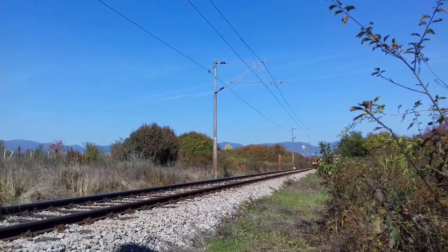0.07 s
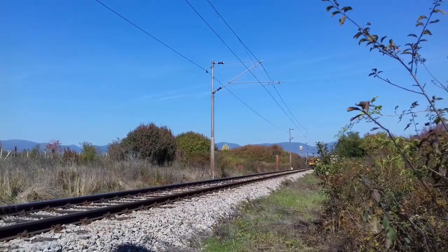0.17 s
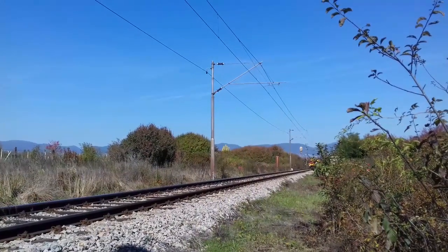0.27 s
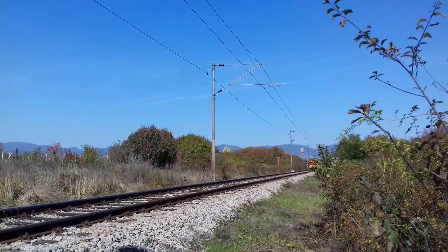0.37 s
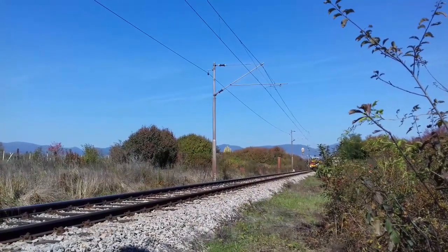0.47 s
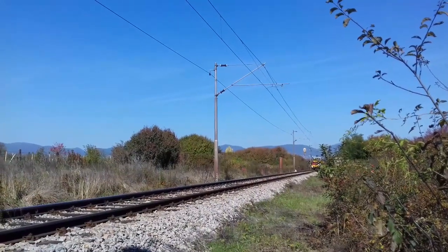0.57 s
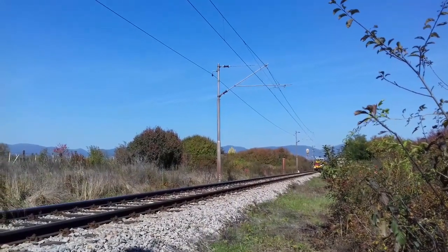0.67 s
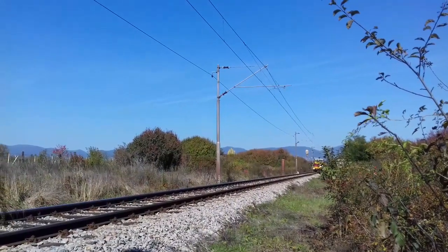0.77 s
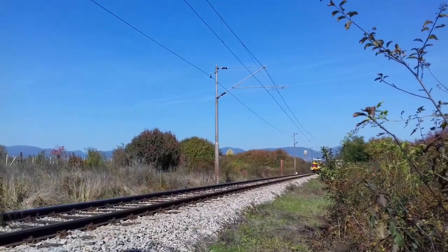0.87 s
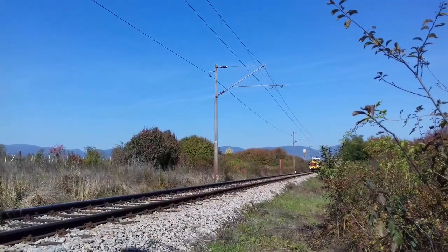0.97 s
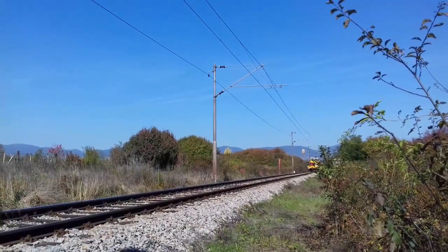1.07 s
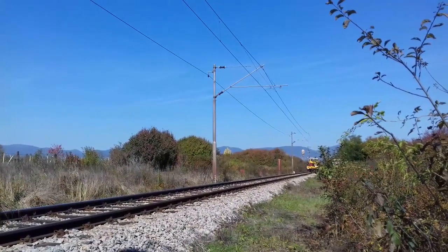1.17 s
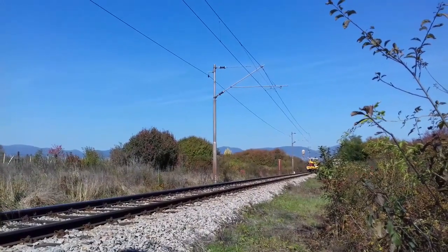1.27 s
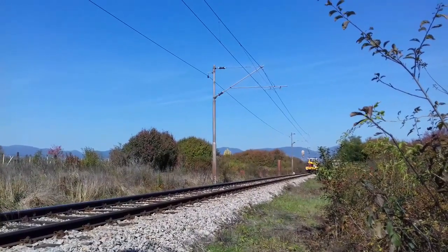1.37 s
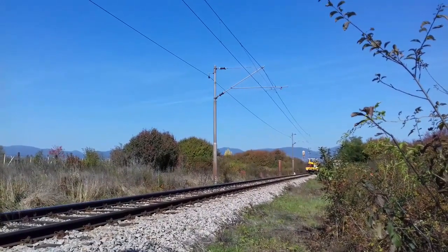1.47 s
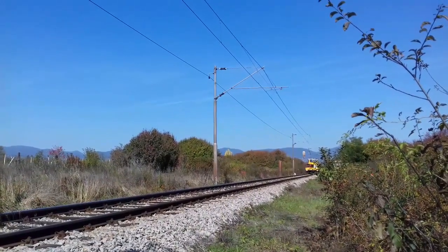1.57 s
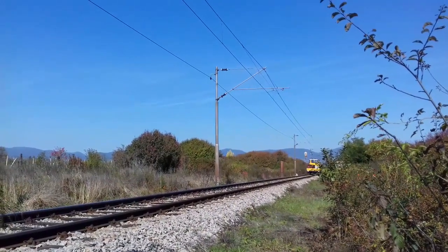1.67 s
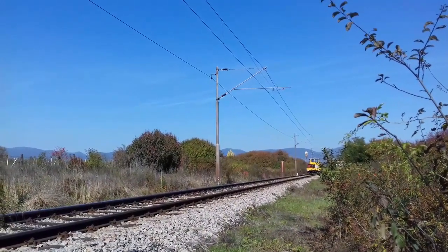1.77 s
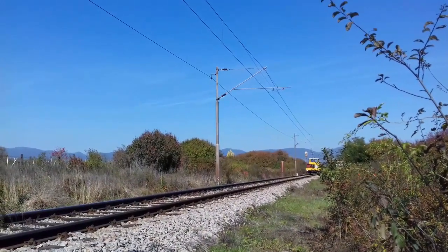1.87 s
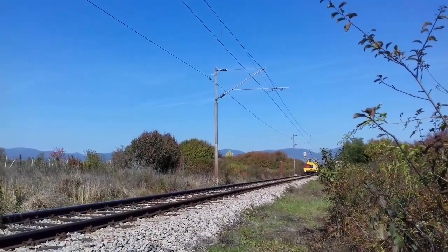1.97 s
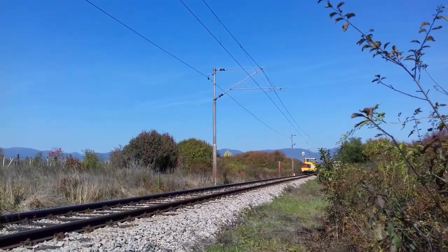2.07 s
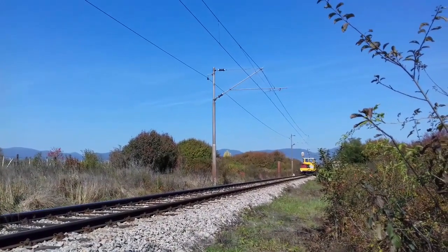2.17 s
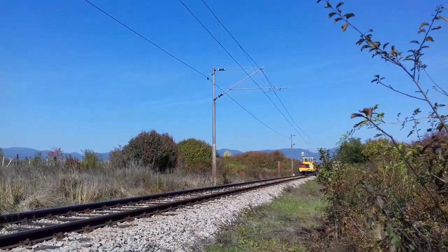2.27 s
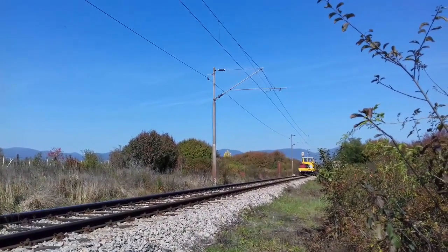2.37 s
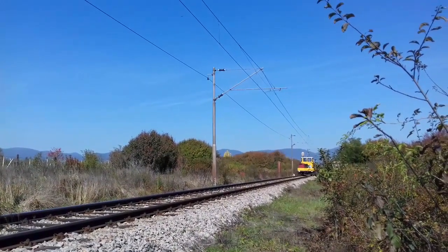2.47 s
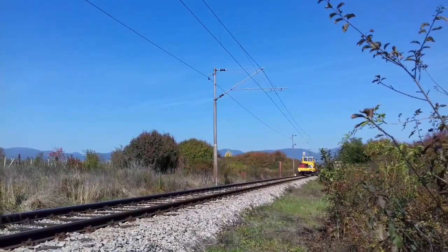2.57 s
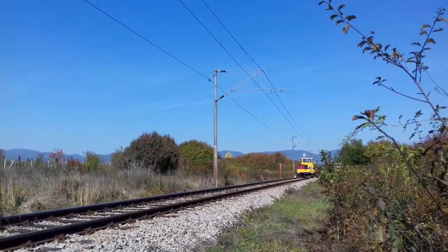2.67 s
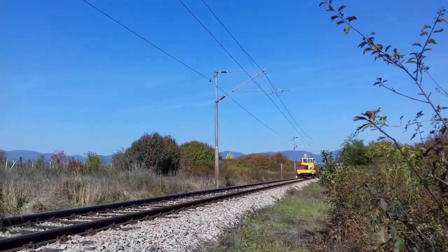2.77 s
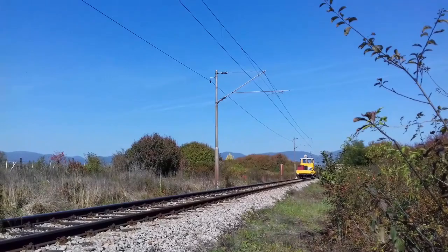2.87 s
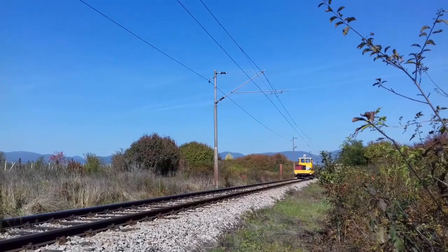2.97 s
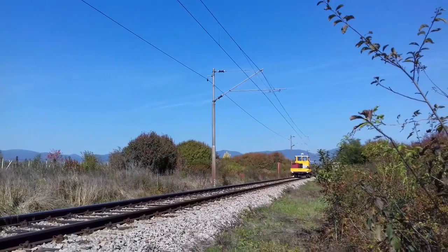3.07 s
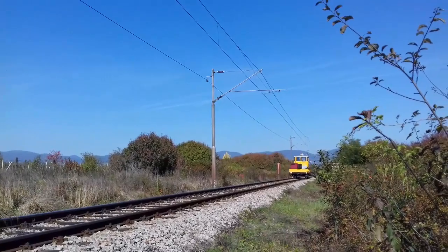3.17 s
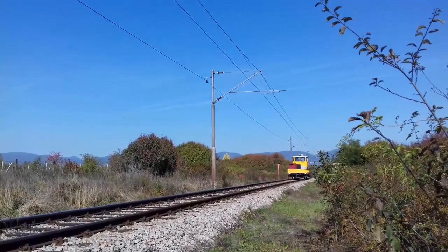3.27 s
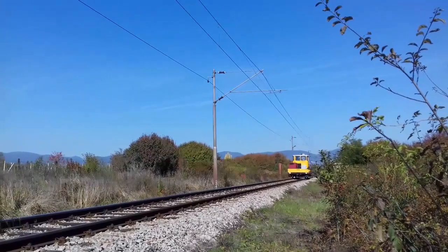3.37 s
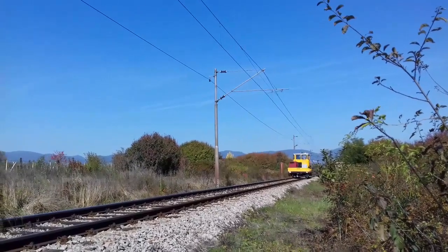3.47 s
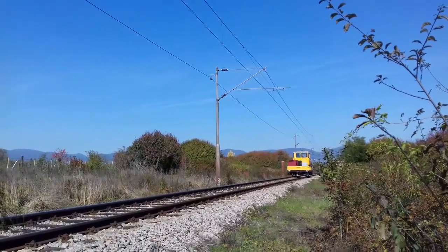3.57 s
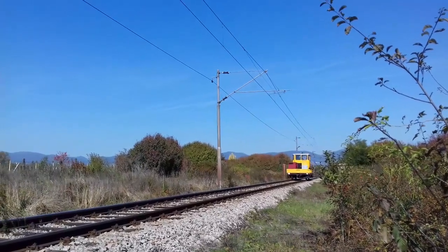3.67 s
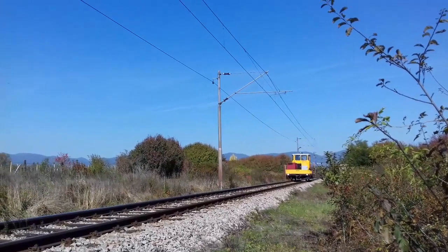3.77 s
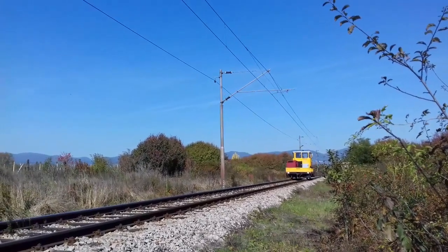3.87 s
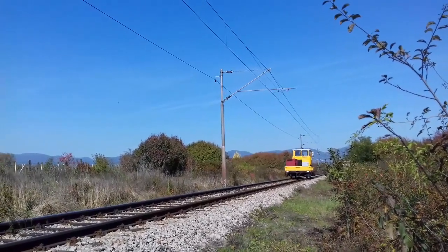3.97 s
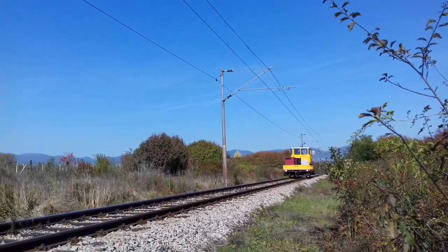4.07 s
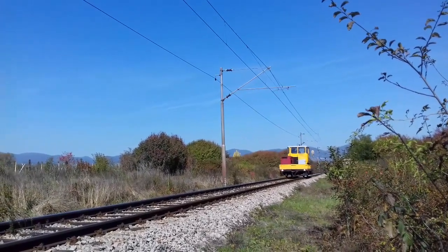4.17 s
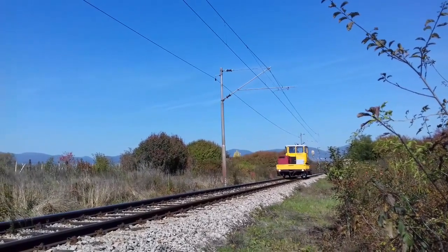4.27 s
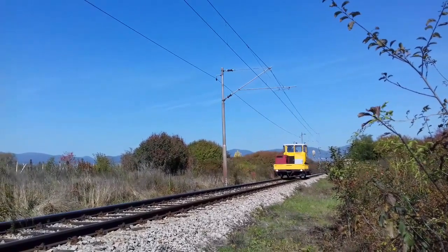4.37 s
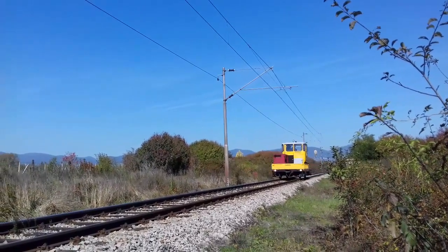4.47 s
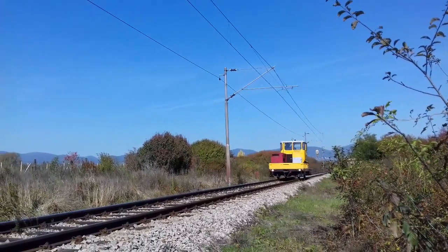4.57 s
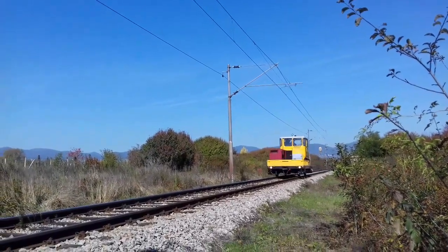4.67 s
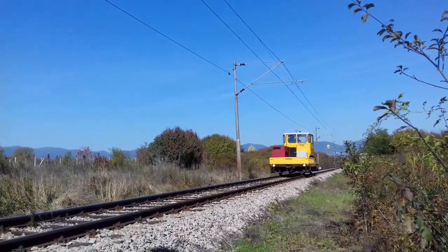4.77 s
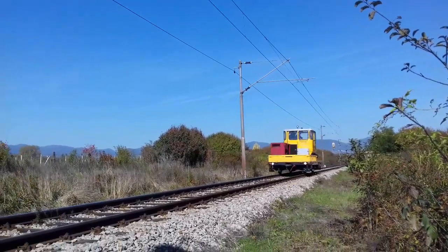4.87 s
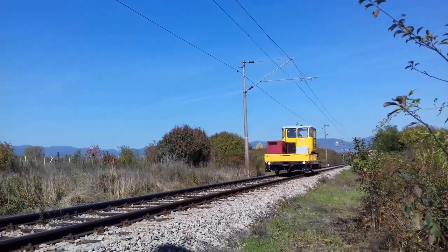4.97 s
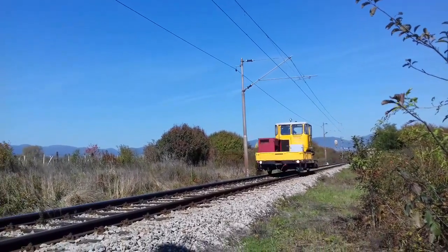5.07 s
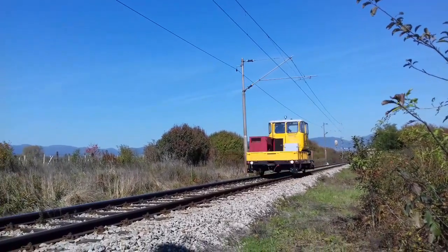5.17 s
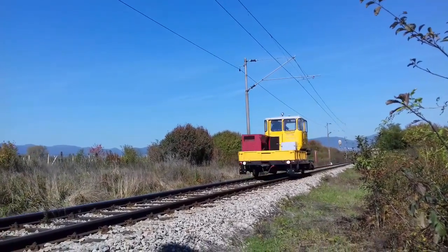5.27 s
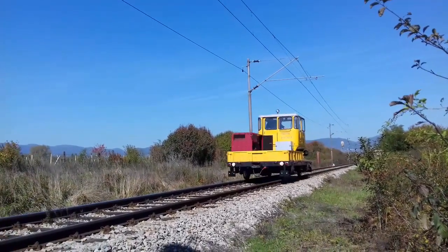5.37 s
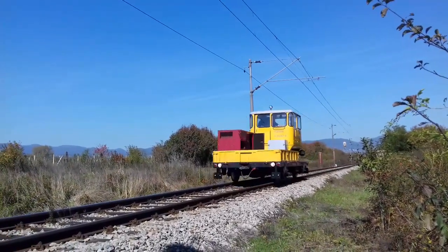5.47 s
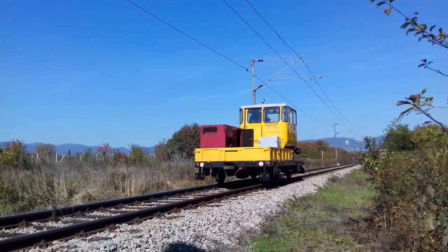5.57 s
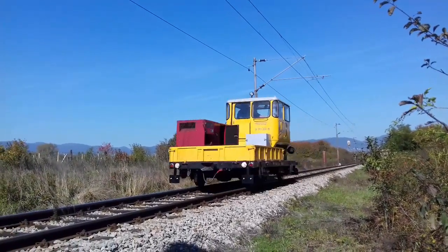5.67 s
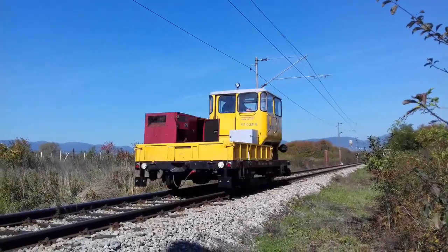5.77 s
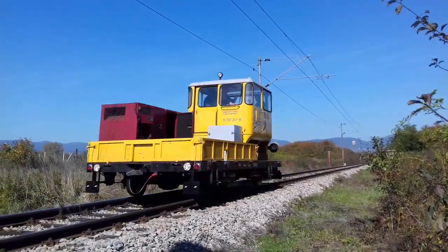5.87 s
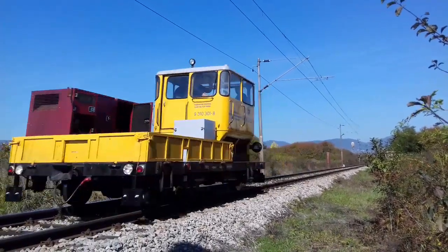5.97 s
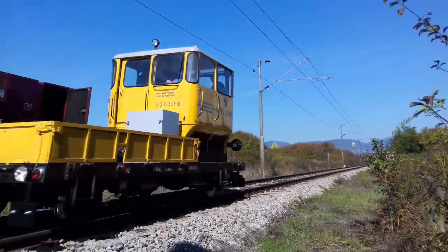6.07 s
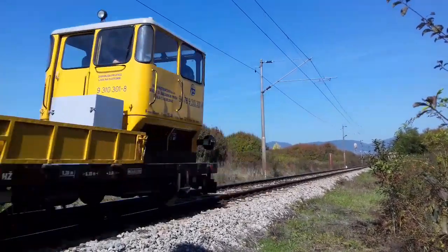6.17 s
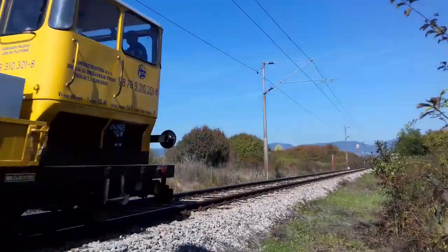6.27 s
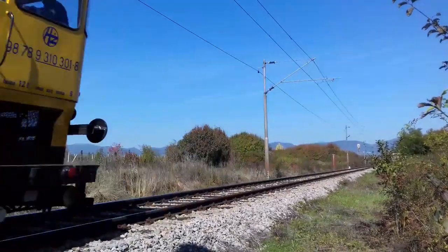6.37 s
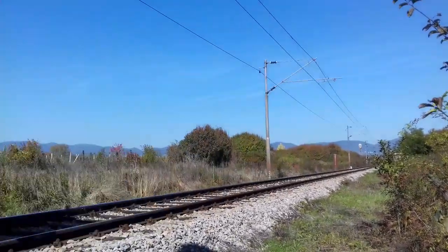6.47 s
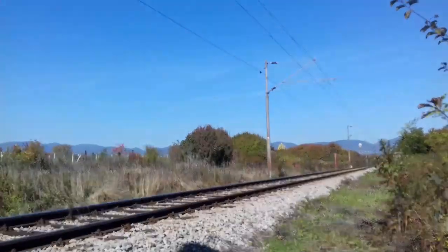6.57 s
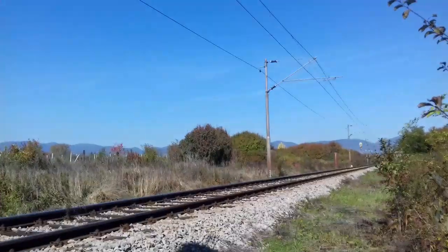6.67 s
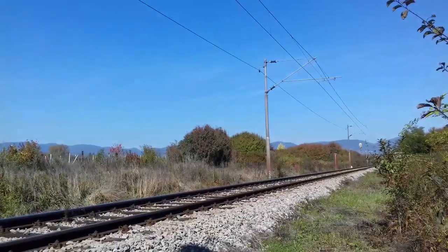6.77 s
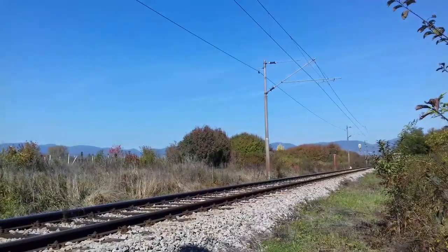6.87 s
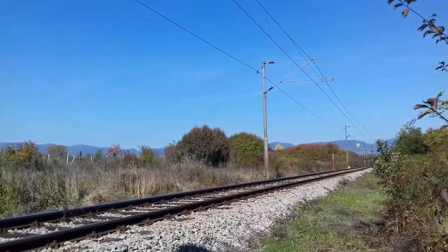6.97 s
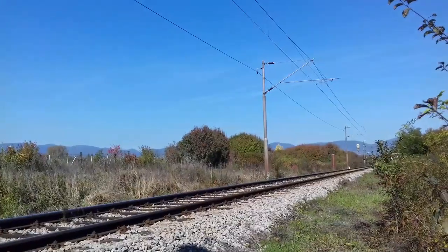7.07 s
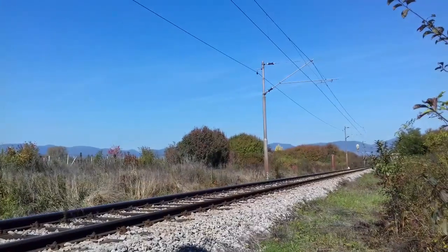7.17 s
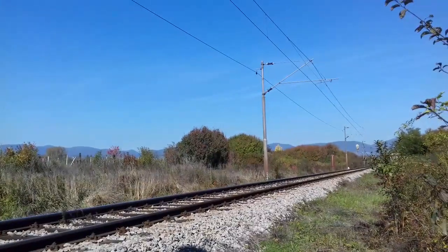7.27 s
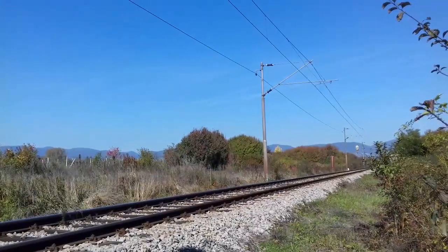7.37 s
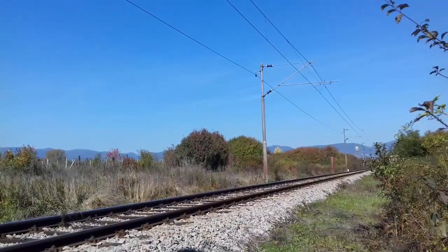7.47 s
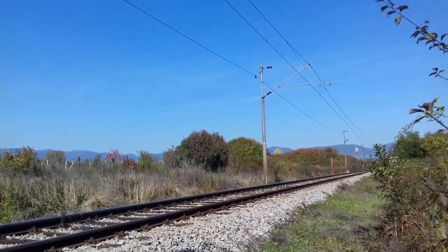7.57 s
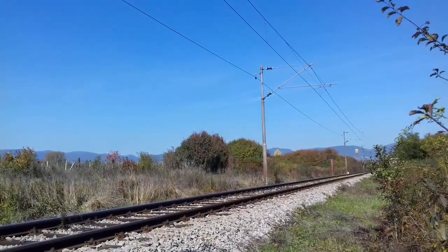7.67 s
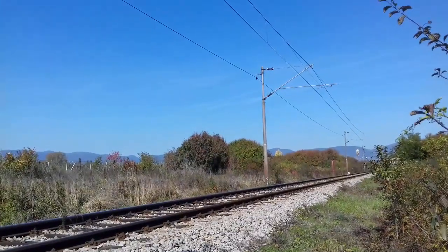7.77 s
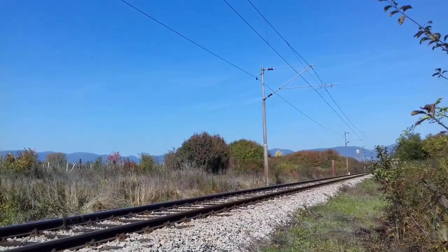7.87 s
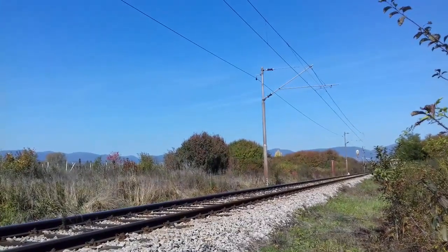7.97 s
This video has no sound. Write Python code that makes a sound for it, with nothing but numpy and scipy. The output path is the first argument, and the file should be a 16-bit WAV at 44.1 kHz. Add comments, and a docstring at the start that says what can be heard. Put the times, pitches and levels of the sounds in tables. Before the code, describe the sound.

A trackside spot in open fields, dry and quiet. From 0 to 2 seconds there is only faint air noise, a low wavering hum and a very distant rolling hiss with a soft diesel drone. Between 2 and 4.5 seconds the small rail trolley gradually grows, its rough wheel noise mid-heavy, the engine hum fluttering beneath. From about 4.8 seconds it swells rapidly; hollow comb-like colours slide down and then back up through the roar, with a faint thin wheel squeal around 5.2 to 5.7 and light knocks and rattle from 5.4. The loudest, fullest rush is about 6 to 6.7 seconds, with a sharper knock near 6.4 and a low body boom around 6.5. The engine pitch drops as it passes. After 6.8 the roar falls away quickly, with a few faint knocks, leaving a receding hollow rumble and hiss until 8 seconds.

```python
"""Straight track through open fields: a small diesel rail trolley comes down it, passes and leaves. Wheels and
rails: noise shaped by broad lifts, with rattle and knocks; a family of dips slides through the roar while
abreast. Engine: sines on multiples of a firing rate that drops in pitch on passing. Fields: faint steady noise
and a wavering low hum."""
import sys
import numpy as np
from scipy import signal
from scipy.io import wavfile
from scipy.ndimage import uniform_filter1d

SR = 44100
rng = np.random.default_rng(int(sys.argv[2]) if len(sys.argv) > 2 else 0)


def materialize(psi):
    """Save the field psi as 16-bit PCM at rate SR to the path in sys.argv[1].

    A 1-D psi becomes a single channel; in a 2-D psi each row is a channel.
    """
    bounded = np.clip(np.atleast_2d(psi).T, -1, 1)
    quanta = np.round(bounded * 32767).astype(np.int16)
    wavfile.write(sys.argv[1], SR, quanta)


N = 353682  # samples
HOP = 256  # samples between short-time spectra
WINDOW = 8 * HOP  # samples

# roar level over 400-5000 Hz: (time [s], level [dB])
ROAR_LEVEL = [(0.0, -50.5), (1.8, -44.5), (3.39, -38.5), (4.8, -27), (4.93, -25.5), (5.25, -23.5),
              (5.3, -21), (5.45, -22), (5.5, -19), (6.08, -12.5), (6.59, -13), (6.86, -16.5), (7.12, -17.5),
              (7.16, -22), (7.3, -24), (7.73, -29), (7.91, -28.5), (8.02, -25)]
# hiss above 5 kHz re roar: (far off [dB], ahead [dB], abreast [dB], behind [dB])
HISS_RE_ROAR_DB = (-23.5, -22, -22.5, -17)


def gain_of(db):
    """dB to amplitude gain."""
    return 10 ** (np.asarray(db) / 20)


def evened(x):
    """Scales to rms 1."""
    return x / np.sqrt(np.mean(x ** 2) + 1e-20)


def read(points, hz):
    """Interpolates a spectrum on a log-frequency axis."""
    f, value = np.transpose(points)
    return np.interp(np.log(hz + 1), np.log(f + 1), value)


def columns(rows, t):
    """Interpolates each column of a curve table at times t; end rows hold."""
    s, *values = np.transpose(rows)
    return [np.interp(t, s, v) for v in values]


def bell(x, centre, width):
    """Gaussian of height 1; width is taken at half height."""
    return np.exp(-4 * np.log(2) * ((x - centre) / width) ** 2)


def bumps_db(rows, hz):
    """Sums bell-shaped spectral lifts in dB."""
    return sum(lift_db * bell(hz, centre_hz, width_hz) for centre_hz, width_hz, lift_db in rows)


def wander(smooth_s):
    """Smoothed random drift of rms 1."""
    size = max(round(smooth_s * SR), 1)
    once = uniform_filter1d(rng.standard_normal(N), size)
    return evened(uniform_filter1d(once, size))


def grid():
    """Frequencies (column) and times of the short-time spectra."""
    hz = np.fft.rfftfreq(WINDOW, 1 / SR)[:, None]
    return hz, np.arange(N // HOP + 12) * HOP / SR


def shaped(x, gain):
    """Filters x by a gain over frequency and time."""
    size = dict(nperseg=WINDOW, noverlap=WINDOW - HOP)
    z = signal.stft(x, **size)[2]
    return signal.istft(z * gain[:, :z.shape[1]], **size)[1][:N]


def by_angle(t, far, ahead, abreast, behind):
    """Blends four values as the view of the trolley turns."""
    # far to ahead, ahead to abreast, abreast to behind: (start [s], end [s])
    turn_spans = [(1.8, 3.1), (4.9, 6.3), (6.7, 7.25)]
    near, past, gone = (np.interp(t, span, [0, 1]) for span in turn_spans)
    approach = (1 - near) * far + near * ahead
    return (1 - past) * approach + (past - gone) * abreast + gone * behind


def view_colour_db(hz, t):
    """Roar spectrum by viewing angle: broad lifts ahead, frame and axle resonances abreast."""
    # roar spectrum before levelling, by view: (frequency [Hz], density [dB per Hz])
    far = [(15, -60), (30, -20), (80, -10.5), (200, -10), (450, -9.5), (1100, 0.5), (2100, -4), (2600, -6),
           (3150, -4), (3480, -12), (4000, -6), (4500, -12.5), (5200, -32.5), (7400, -37), (15800, -48)]
    ahead = [(15, -70), (30, -26.5), (170, -1.5), (450, -8.5), (1000, -4), (1900, -6.5), (2500, -10),
             (3150, -11), (3480, -15.5), (4000, -12), (4600, -18), (5200, -28), (7400, -37), (15800, -46.5)]
    abreast = [(15, -61), (25, -21), (59, -33), (133, -14), (222, -10), (261, -10.5), (371, -8), (691, 1),
               (929, -1), (1320, -1.5), (1980, -12), (2660, -9), (3680, -10), (5820, -29), (15800, -47)]
    behind = [(15, -69), (25, -42), (70, -17), (110, -14), (235, -7), (269, -13), (414, 0), (513, -2),
              (981, -1.5), (1320, -6), (2590, -5), (3300, -11), (4210, -10.5), (7220, -34.5),
              (15800, -47.5)]
    # broad lifts while the trolley is ahead; the top two are thin airy bands above 9 kHz: (centre [Hz], width
    # [Hz], lift [dB])
    ahead_lifts = [(672, 300, 7.5), (1172, 264, 6), (1960, 570, 4.5), (3210, 1130, 2), (6000, 870, 2.5),
                   (9800, 330, 2), (13800, 900, 4)]
    # frame and axle resonances heard from abreast: (centre [Hz], width [Hz], lift [dB])
    frame = [(147, 21, 2), (283, 25, 4), (556, 37, 1.5), (740, 22, -0.5), (1096, 43, 3), (1383, 160, 3),
             (1775, 48, 4.5), (1976, 260, 4.5)]
    ahead_lift_db = bumps_db(ahead_lifts, hz)
    return by_angle(t, read(far, hz) + 0.78 * ahead_lift_db, read(ahead, hz) + ahead_lift_db,
                    read(abreast, hz) + bumps_db(frame, hz), read(behind, hz))


def sliding_dips(hz, t):
    """Comb gain of dips repeating up the spectrum, and dB lift of the bright bands between them."""
    # (time [s], lowest dip [Hz], depth before treble blur [0-1], bright-band lift [dB])
    dips = [(0, 3500, 0.3, -2), (3, 3830, 0, -2), (4.75, 3500, 0.42, 0), (4.9, 3280, 0.64, 3),
            (5.0, 2900, 0.76, 3), (5.06, 2570, .9, 9.5), (5.2, 1940, .73, 3.5), (5.3, 1730, .55, 3.5),
            (5.45, 1500, 0.6, 2.5), (5.58, 1670, 0.92, 1), (5.68, 2180, .6, 7.5), (5.8, 2570, 0.9, 5.5),
            (6.0, 2710, 0.77, 6), (6.6, 2743, 0.48, 4), (6.8, 2640, 0, 1.5), (6.95, 1300, 0, 3),
            (7.3, 600, 0, 0)]
    step_hz, bright_width_hz, bright_top_hz = 3800, 1260, 3920
    dip_hz, depth, lift_db = columns(dips, t)
    depth = np.clip(depth, 0, 1) / (1 + (hz / 7000) ** 2)  # blurred in the treble
    off_hz = (hz - dip_hz + step_hz / 2) % step_hz - step_hz / 2  # offset from nearest dip
    cut = depth * bell(off_hz, 0, 330 + 0.23 * dip_hz)
    comb = 1 - cut / (1 + (900 / (hz + 1)) ** 4)  # dips fade out in the bass
    bright_hz = np.minimum(2230 + 0.63 * dip_hz, bright_top_hz)  # lowest band follows part of the slide
    bands = sum(bell(hz, bright_hz + k * step_hz, bright_width_hz) for k in range(4))
    return comb, lift_db * bands


def ground_echo_db(hz, t):
    """Ground echo hollows a broad band of the roar, rising in pitch as the trolley leaves."""
    # (time [s], centre [Hz], depth [dB]); first row holds before its time
    hollow = [(6.85, 1006, 5.5), (7.05, 1050, 7), (7.3, 1330, 7.5), (7.7, 1590, 7), (8.02, 1640, 5.5)]
    hollow_hz, depth_db = columns(hollow, t)
    return -depth_db * bell(hz, hollow_hz, 1000)


def booms_db(hz, t, edge_s=0.062):
    """Low booms of the body, front then tail: gliding broad lifts of the roar."""
    # (start [s], end [s], start pitch [Hz], end pitch [Hz], lift [dB])
    booms = [(4.6, 6.1, 790, 634, 3), (6.42, 6.56, 290, 300, 12), (6.5, 7.08, 324, 380, 7),
             (6.08, 6.24, 650, 680, 2.5)]
    total_db = 0
    for start_s, end_s, start_hz, end_hz, lift_db in booms:
        boom_hz = np.interp(t, [start_s, end_s], [start_hz, end_hz])
        on = np.clip(np.minimum(t - start_s, end_s - t) / edge_s + 0.5, 0, 1)
        total_db = total_db + lift_db * on * bell(hz, boom_hz, 0.8 * boom_hz)
    return total_db


def squeal_db(hz, t):
    """Faint thin wheel squeal: a narrow lift of the roar that swells and fades."""
    # (half-height start [s], half-height end [s], centre [Hz], width [Hz], lift [dB])
    squeal = (5.2, 5.7, 5300, 300, 6.7)
    start_s, end_s, centre_hz, width_hz, lift_db = squeal
    swell = bell(t, (start_s + end_s) / 2, end_s - start_s)
    return lift_db * bell(hz, centre_hz, width_hz) * swell


def rumble_re_roar_db(t):
    """Rumble level re roar by angle, with short swells on approach and in passing."""
    # (far off [dB], ahead [dB], abreast [dB], behind [dB])
    rumble_db = (-11.5, -12, -10.5, -11)
    # (centre [s], length [s], lift [dB])
    rumble_swells = [(3.302, .8, 1.5), (6.14, .15, 2.5), (6.5, 0.17, 3), (6.85, .35, 7)]
    swell_db = sum(lift_db * bell(t, s, length_s) for s, length_s, lift_db in rumble_swells)
    return by_angle(t, *rumble_db) + swell_db


def roar_gain(patchy_db=0.94):
    """Rolling-noise gain: colour, dips and lifts, levelled in three bands, with random patches."""
    hz, t = grid()
    comb, bright_db = sliding_dips(hz, t)
    colour_db = view_colour_db(hz, t) + bright_db
    colour_db += ground_echo_db(hz, t) + squeal_db(hz, t) + booms_db(hz, t)
    gain = gain_of(colour_db) * comb

    def band_db(low_hz, high_hz):
        """Power of the coloured noise in a band."""
        inside = (hz[:, 0] > low_hz) & (hz[:, 0] < high_hz)
        return 10 * np.log10((gain[inside] ** 2).sum(0) / len(hz))

    low = 1 / (1 + (hz / 400) ** 4)
    high = 1 / (1 + (5000 / (hz + 1)) ** 30)
    level_db = low * (rumble_re_roar_db(t) - band_db(100, 400))
    level_db += high * (by_angle(t, *HISS_RE_ROAR_DB) - band_db(5000, 15500))
    level_db -= (1 - low - high) * band_db(400, 5000)
    roar_db, = columns(ROAR_LEVEL, t)
    patches = uniform_filter1d(rng.standard_normal(gain.shape), 10, 1)  # over frames
    patches = evened(uniform_filter1d(patches, 24, 0))  # over frequency bins
    return gain * gain_of(roar_db + level_db + patchy_db * patches)


def rattle(per_s=600, decay_samples=60):
    """Chassis rattle: noise bursts at random instants, each decaying exponentially."""
    size_db = 1.6 * np.minimum(rng.exponential(1, N), 3)
    ticks = gain_of(size_db) * (rng.random(N) < per_s / SR)
    burst = np.exp(-np.arange(400) / decay_samples)
    return evened(signal.oaconvolve(ticks, burst)[:N] * rng.standard_normal(N))


def rolling(turns, throb=0.027, jolt_db=0.62, rattle_db=-11, split_hz=4500):
    """Rough wheel-rail contact noise; chassis jolts and rattle in the treble, engine throb overall."""
    drive = rng.standard_normal(N) * gain_of(0.5 * wander(0.0089))
    fizz = rng.standard_normal(N) + 2 * gain_of(rattle_db) * rattle()
    fizz = evened(fizz * gain_of(jolt_db * wander(0.04)))
    split = signal.butter(2, split_hz, fs=SR, output="sos")
    body = signal.sosfiltfilt(split, drive)
    top = (fizz - signal.sosfiltfilt(split, fizz)) * knocks()
    # every second firing is stronger
    beat = 1 + throb * np.cos(np.pi * turns) + 0.027 * np.cos(2 * np.pi * turns)
    return shaped((body + top) * beat, roar_gain())


def firing():
    """Running count of engine firings as heard: Doppler crowds them on approach, stretches them after."""
    # (firing rate [Hz], speed [share of speed of sound], closest [s], time to cover distance to track [s])
    pass_by = (85.6, .0537, 6.55, 0.3475)
    rate_hz, speed, closest_s, reach_s = pass_by
    along_s = np.arange(N) / SR - closest_s
    receding = along_s / np.hypot(along_s, reach_s)
    return np.cumsum(rate_hz * (1 - speed * receding)) / SR


def engine(turns, waver_db=1.7, smear=0.13):
    """Exhaust hum: sines on firing-rate multiples, wavering in level and phase in the moving air."""
    # (multiple of firing rate, level re roar far off [dB], ahead [dB], abreast [dB], behind [dB])
    orders = [(1, -35, -41, -38, -24.5), (1.5, -32, -28, -29.5, -33), (2, -26, -23, -26, -25),
              (3, -22.5, -18.5, -14.5, -17), (3.5, -25, -33, -25, -23), (4, -16, -17.5, -29, -27),
              (5, -32, -31, -26, -26)]
    # passing lift or sag of one multiple: (centre [s], multiple, length [s], lift [dB])
    swells = [(.5, 4, .7, -3), (1.35, 4, .5, 3), (3.052, 4, .5, 8), (3.5, 3, .7, 4.5), (4.0, 4, 0.65, -3.5),
              (4.2, 3, 0.43, -3), (4.7, 4, .3, 1), (5.35, 3, 0.44, 5.5), (5.85, 3, 0.63, 2.5),
              (6.1, 1, .2, 3), (6.148, 3.5, .2, 17.5), (6.142, 4, 0.085, 16), (6.257, 3, 0.14, -7),
              (6.469, 3, 0.13, 7), (6.783, 3, 0.083, -8), (6.8, 1, .5, 6), (6.84, 3.5, .16, 10),
              (6.94, 3, .08, 7), (7.03, 3, 0.098, -19)]
    t = np.arange(N) / SR
    roar_db, = columns(ROAR_LEVEL, t)
    smear_by_view = by_angle(t, 1.6, 1.5, 0.75, 0.9)
    out = np.zeros(N)
    for multiple, *re_roar_db in orders:
        db = roar_db + by_angle(t, *re_roar_db)
        for s, which, length_s, lift_db in swells:
            if which == multiple:
                db += lift_db * bell(t, s, length_s)
        phase = 2 * np.pi * (multiple * turns + rng.random())
        phase += smear * multiple * smear_by_view * wander(0.06)
        out += np.sqrt(2) * gain_of(db + waver_db * wander(0.12)) * np.sin(phase)
    return out


def field(air_db=-57.5, hum_hz=77, hum_db=-67):
    """Steady faint shaped noise with a low hum wavering in level and phase."""
    # noise colour before levelling: (frequency [Hz], density [dB per Hz])
    air_colour = [(15, -44), (35, -20), (60, 0), (76, 2), (98, -30), (400, -17), (760, 2), (1000, -29),
                  (2200, -5.5), (3400, -35), (5000, -33), (15000, -31.5), (15800, -40)]
    hz, t = grid()
    gain = gain_of(read(air_colour, hz)) + 0 * t  # same in every frame
    air = gain_of(air_db) * evened(shaped(rng.standard_normal(N), gain))
    phase = 2 * np.pi * hum_hz * np.arange(N) / SR + 1.1 * wander(0.067)
    hum = np.sqrt(2) * gain_of(hum_db + 1.6 * wander(0.1)) * np.sin(phase)
    return air + hum


def knocks(decay_s=0.0029, crest_db=16):
    """Light wheel knocks: gain on the rolling treble that jumps up and decays exponentially."""
    # (time [s], nominal peak [dB])
    knock_peaks = [(5.4416, -40), (5.6706, -20), (5.7524, -18), (5.8257, -24), (5.9355, -31), (6.0747, -26),
                   (6.1794, -26.5), (6.4004, -13), (6.4887, -29), (6.804, -35), (7.0385, -28),
                   (7.1787, -25)]
    t = np.arange(N) / SR
    lift = np.zeros(N)
    hiss_db = columns(ROAR_LEVEL, t)[0] + by_angle(t, *HISS_RE_ROAR_DB)
    for s, peak_db in knock_peaks:
        at = round(s * SR)
        lift[at] = gain_of(peak_db - crest_db - hiss_db[at])  # noise peaks stand above its rms
    return 1 + signal.lfilter([1], [1, -np.exp(-1 / (decay_s * SR))], lift)


def scene():
    """Trolley over the fields."""
    turns = firing()
    return (rolling(turns) + engine(turns) + field())[None]


def record(dry, edge_hz=15830):
    """Rounds off the loudest peaks, then limits the band."""
    soft = np.tanh(dry / 1.48) * 1.525
    lowpass = signal.firwin(1023, edge_hz, window=("kaiser", 10), fs=SR)
    return signal.oaconvolve(soft, lowpass[None], "same")


dry = scene()
out = record(dry)
materialize(out)
```